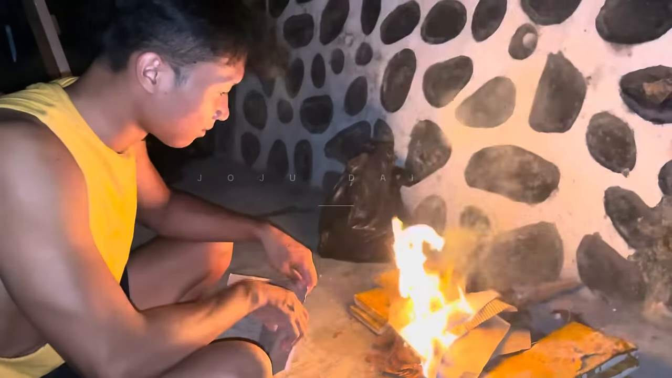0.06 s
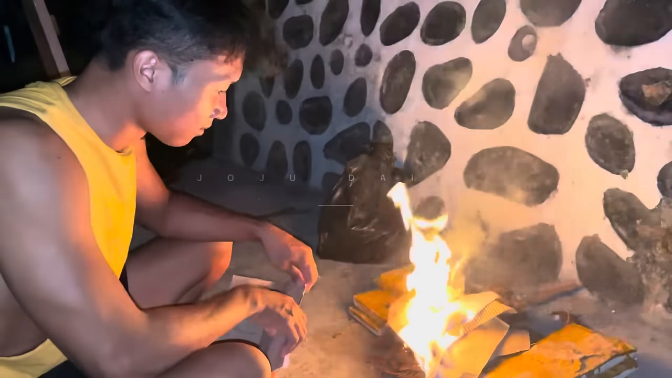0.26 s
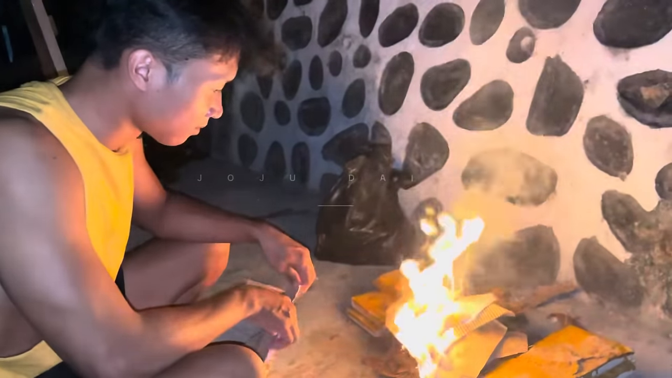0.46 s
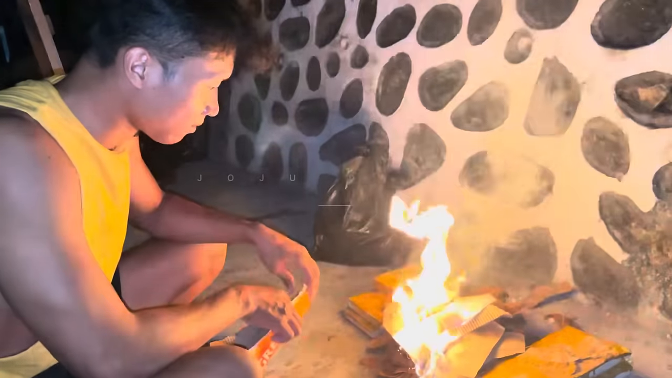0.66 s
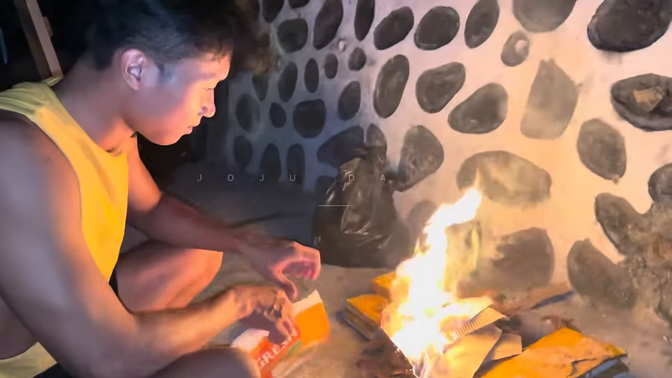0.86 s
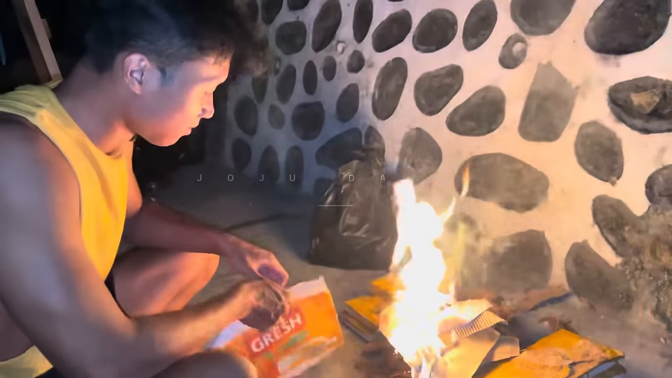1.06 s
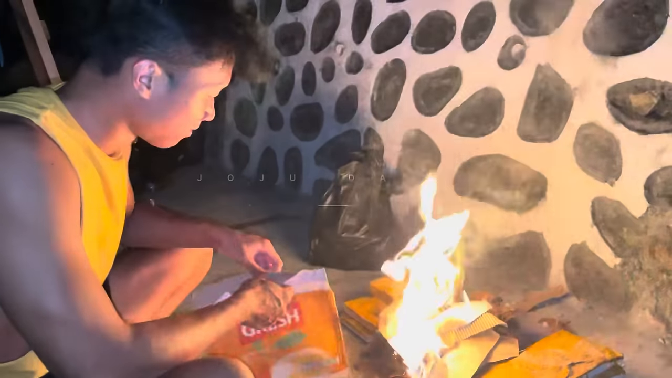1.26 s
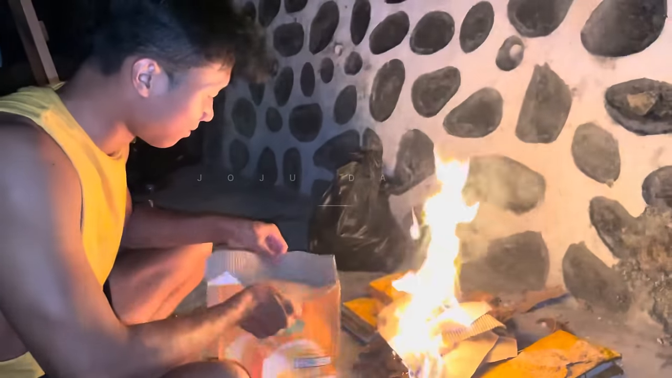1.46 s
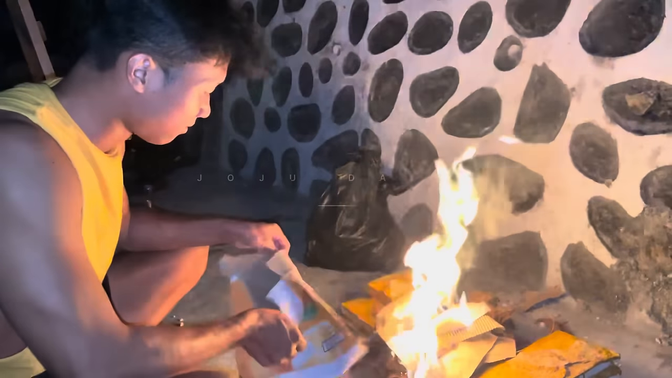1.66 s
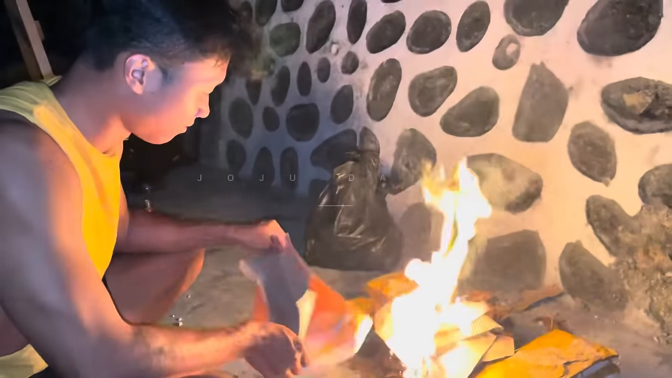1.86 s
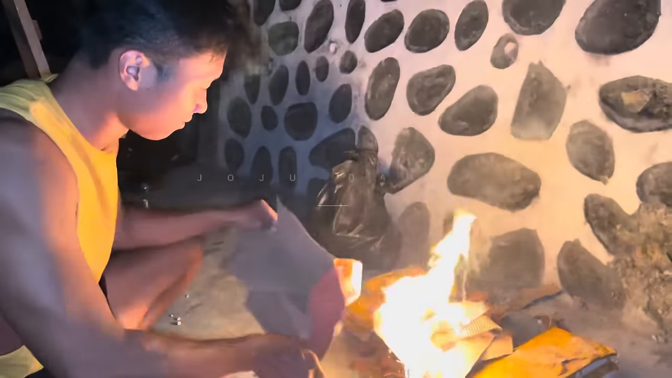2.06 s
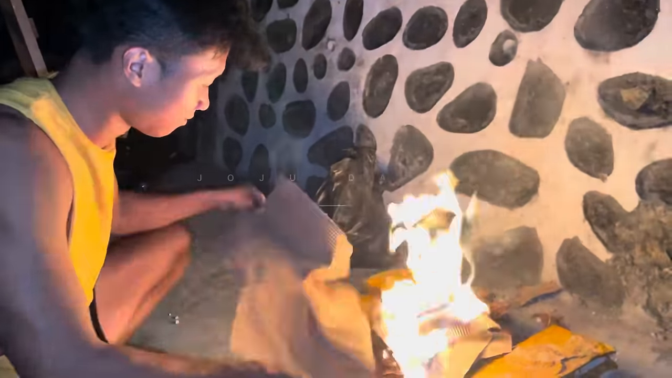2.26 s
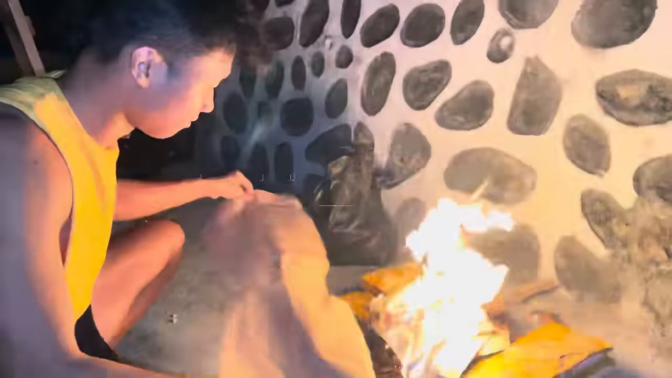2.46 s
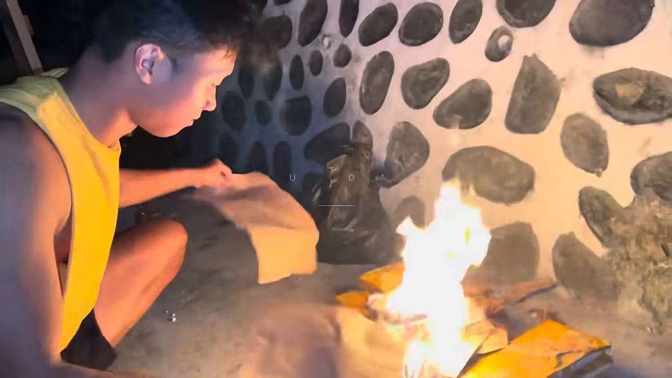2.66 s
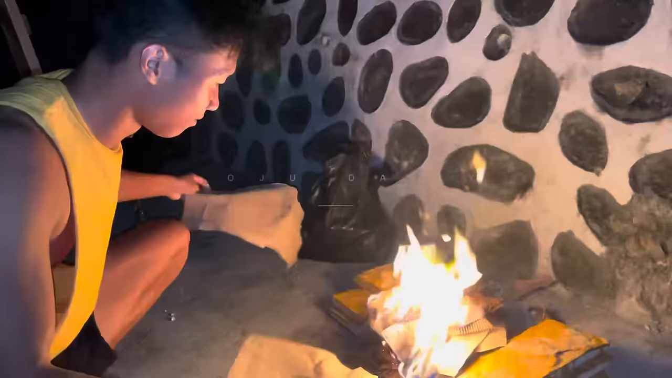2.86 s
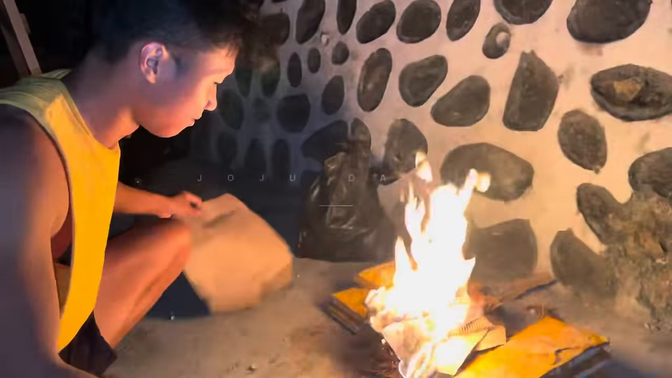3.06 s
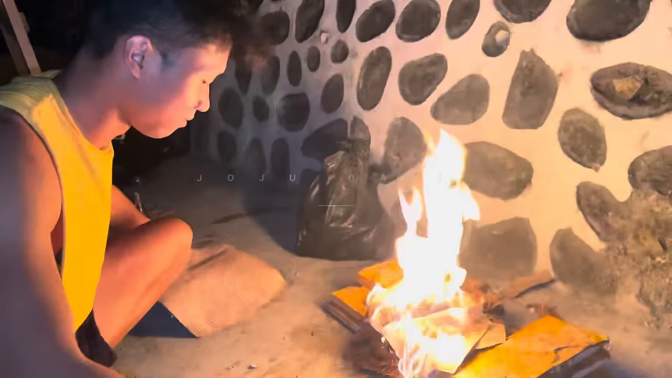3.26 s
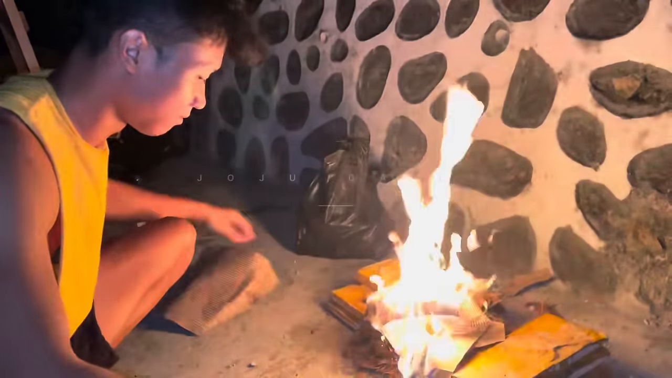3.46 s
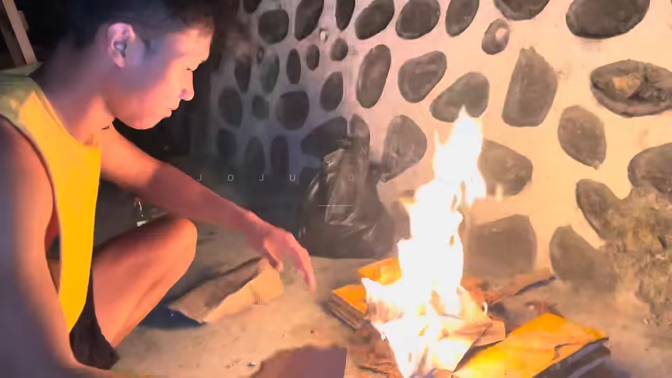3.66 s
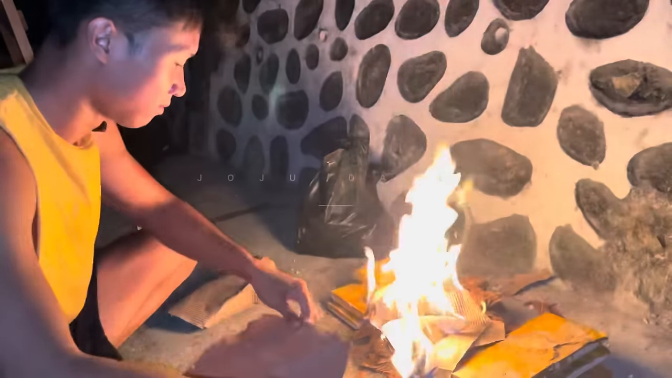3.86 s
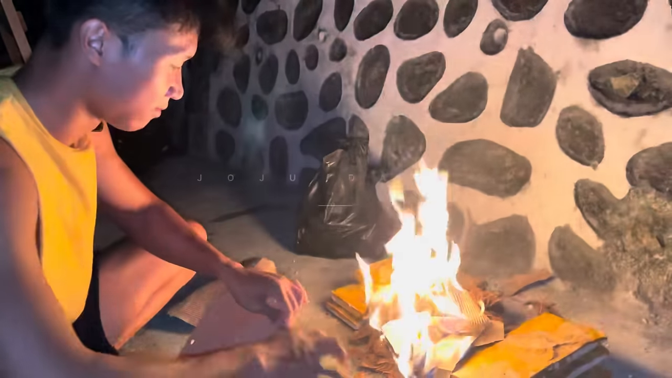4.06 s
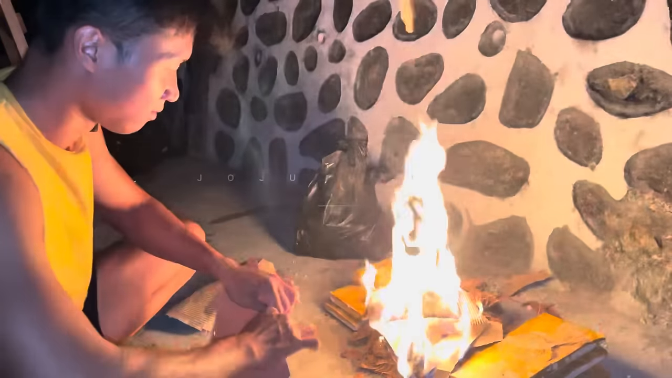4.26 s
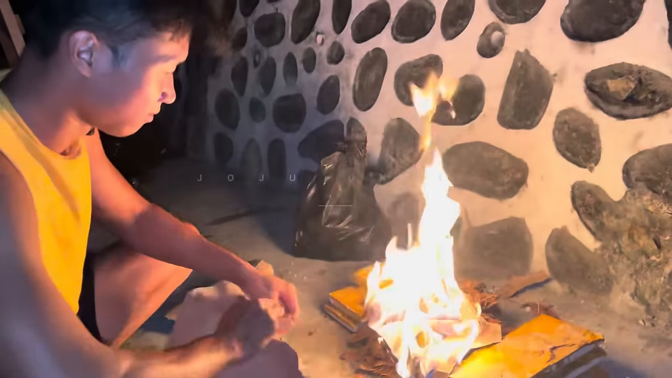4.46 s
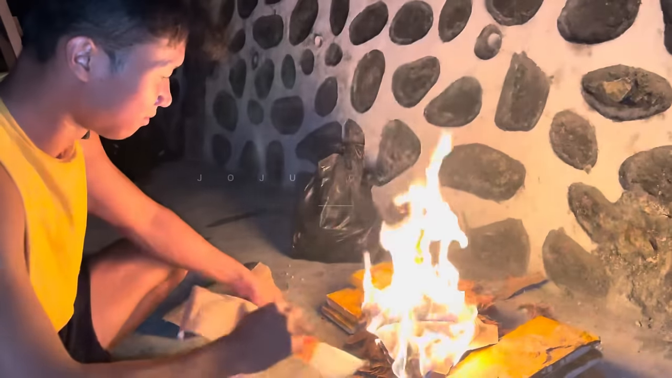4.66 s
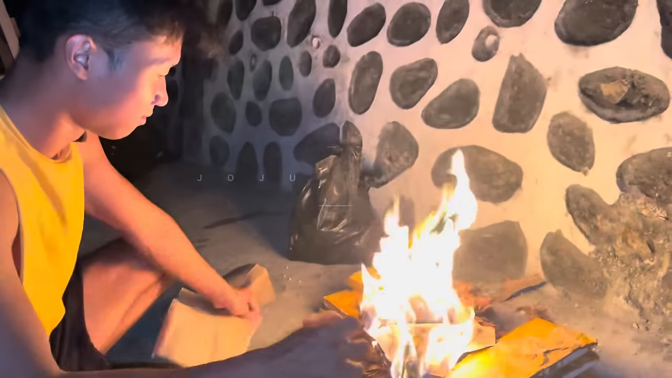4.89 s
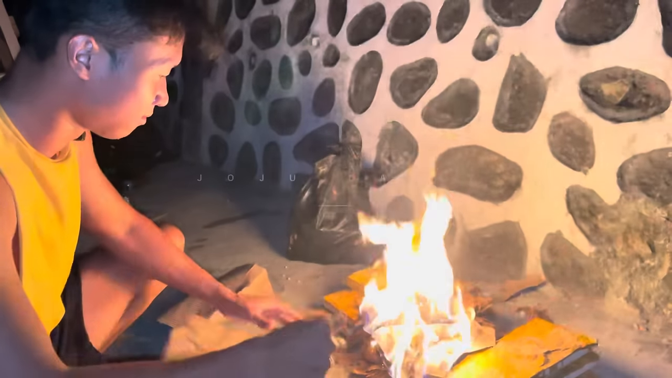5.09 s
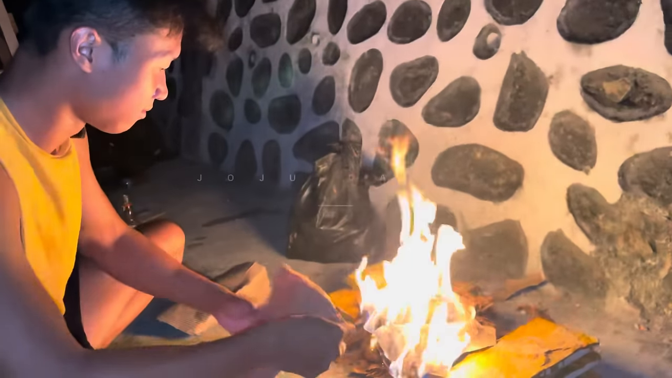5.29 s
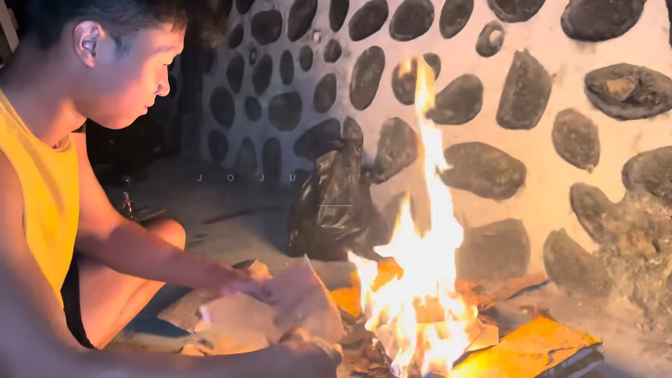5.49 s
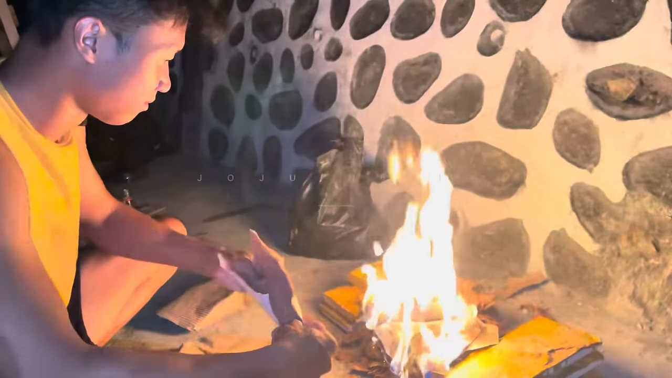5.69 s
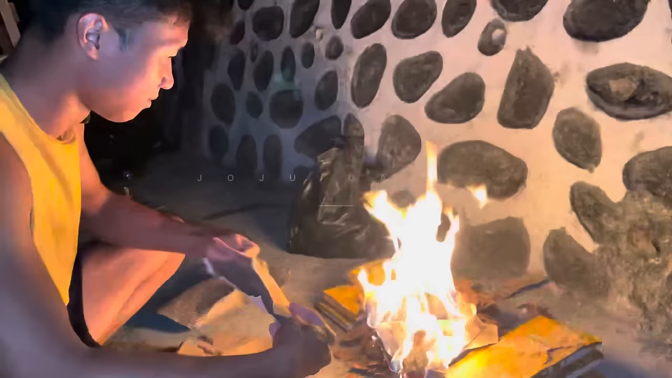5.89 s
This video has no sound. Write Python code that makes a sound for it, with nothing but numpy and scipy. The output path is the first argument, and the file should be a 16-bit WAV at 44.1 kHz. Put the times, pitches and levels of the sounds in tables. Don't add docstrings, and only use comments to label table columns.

```python
import sys
import numpy as np
from scipy import signal
from scipy.io import wavfile
from scipy.ndimage import uniform_filter1d

SR = 44100
rng = np.random.default_rng(int(sys.argv[2]) if len(sys.argv) > 2 else 0)


def to_linear_factor(level_db):
    exponent = np.asarray(level_db, float) / 20
    return 10 ** exponent


def pcm_store(signal):
    levels = np.round(np.clip(np.atleast_2d(signal), -1, 1) * 32767)
    wavfile.write(sys.argv[1], SR, levels.astype(np.int16).T)


N = 261468

# freq_hz, density_db
FIBRE_SPECTRUM = [(1500, -24.5), (3150, -14.5), (3800, -7.5), (4600, -4), (7000, -1.5), (10000, -2),
                  (13200, 0.5), (14100, -2)]
# freq_hz, density_db
SHEET_SPECTRUM = [(100, -37.5), (210, -18.5), (350, -4.5), (440, -6), (570, -5.5), (740, -9), (1050, -5),
                  (2520, -15), (2950, -24.5), (6000, -42)]
# time_s, effort_db
PULLS = [
    [(1.482, -57.5), (1.492, -41), (1.52, -24.5), (1.534, -21.5), (1.548, -22), (1.566, -14),
     (1.592, -26.5), (1.605, -15.5), (1.625, -27)],
    [(1.625, -27.5), (1.68, -24), (1.7, -25.5), (1.738, -17.5), (1.76, -29)],
    [(1.76, -30), (1.8, -29.5), (1.812, -21.5), (1.835, -25), (1.868, -25), (1.884, -18.5), (1.9, -32),
     (1.914, -20), (1.94, -18)],
    [(1.94, -19.5), (1.952, -12), (1.975, -11), (1.988, -15), (2.12, -19.5), (2.175, -16.5), (2.19, -12.5),
     (2.262, -14), (2.304, -36)],
    [(2.31, -41), (2.324, -22.5), (2.36, -13), (2.415, -13), (2.455, -23)],
    [(2.455, -22), (2.5, -24), (2.515, -19.5), (2.574, -21.5), (2.62, -43)],
    [(2.62, -41), (2.645, -32), (2.658, -20.5), (2.685, -16), (2.698, -17.5), (2.711, -29.5), (2.733, -41),
     (2.742, -51.5), (2.85, -69)],
]
# time_s, effort_db
LATER_PULLS = [
    [(4.41, -77.5), (4.432, -25.5), (4.476, -23.5), (4.542, -17.5), (4.575, -18.5), (4.59, -19.5),
     (4.62, -19.5)],
    [(4.62, -19.5), (4.662, -15), (4.72, -20), (4.778, -12.5), (4.838, -22.5), (4.856, -32), (4.9, -66)],
    [(5.79, -66), (5.815, -43.5), (5.835, -38), (5.852, -31.5), (5.929, -34)],
]
# boom_db (re hiss), deep_db, thin_db, dull_hiss_db
PULL_SHEETS = [(1.5, -3, -0.5, -5.5), (1.5, -5.5, -1, -0.5), (6.5, -11.5, -4, 2), (0, -0.5, -0.5, 0.35),
               (-0.5, -3, -1.5, 1), (-2.5, -4.5, -0.5, 2.5), (-4.5, -4, 4.5, 0), (-1, -0.5, -1.5, 1.5),
               (-2.5, -8.5, 0, -3), (-10, -36, 4.5, -15)]
# peak_s, effort_db, rise_s, fall_s, boom_db (re hiss)
BRUSHES = [(.042, -62, .015, .03, 6), (.276, -45, 0.033, 0.063, -2.5), (.325, -59.5, .06, 0.034, 1),
           (.452, -52.5, 0.096, 0.03, -3), (.638, -46, 0.098, 0.064, -9), (1.1, -36.5, 0.019, 0.12, 3),
           (1.185, -46, 0.069, 0.033, -7.5), (1.47, -51.5, 0.088, 0.068, -12),
           (1.38, -37, 0.075, 0.021, -10), (3.31, -51.5, 0.016, 0.14, 4), (3.34, -41.5, 0.058, 0.064, 3.5),
           (3.658, -56.5, 0.023, 0.12, 0), (4.02, -50.5, 0.096, 0.047, -14),
           (4.112, -46.5, 0.018, 0.034, -14.5), (4.238, -50.5, 0.019, 0.11, -7.5),
           (4.268, -49.5, 0.073, 0.052, -15), (5.04, -56, 0.28, 0.15, -4.5), (5.082, -41, 0.012, 0.044, 6),
           (5.281, -43, 0.008, 0.089, -5), (5.305, -44, 0.03, 0.024, -7), (5.438, -48.5, 0.069, 0.3, -3),
           (5.598, -45, 0.07, 0.066, -0.5)]
# peak_s, effort_db, rise_s, fall_s, boom_db (re hiss)
GRIPS = [(.41, -66, .05, .06, 10), (.978, -55.5, 0.029, 0.13, 10.5), (1.08, -46, 0.0089, .05, -10),
         (1.278, -55, 0.088, 0.049, 4.5), (1.348, -47, 0.036, 0.14, -5), (3.178, -43.5, 0.017, 0.12, 10),
         (3.205, -40, 0.044, 0.048, 10), (3.474, -52.5, 0.0089, 0.026, 16), (3.58, -64, .04, 0.052, 5.5),
         (3.75, -69, 0.17, 0.088, 11), (3.94, -62.5, 0.032, 0.063, 19.5), (5.258, -54, .015, 0.02, 15),
         (5.385, -69.5, 0.06, 0.23, 20.5)]
# peak_s, effort_db, rise_s, fall_s, boom_db (re hiss)
SLAPS = [
    (1.142, -36, 0.024, 0.025, 8),
    (5.618, -44.5, 0.015, 0.11, 13),
    (5.664, -31, 0.026, 0.045, 10),
]
# fine_db (share of hiss), deep_db, thin_db, dull_hiss_db
BRUSH_TONE = (-1.16, -3.5, 1, -10)
GRIP_TONE = (-2.5, -5.5, 0, 5.5)
SLAP_TONE = (-29, 4.5, 5.5, 6)
# time_s, peak_db, ring_hz, crack_db (re peak), t60_s
HANDLED_CREASES = [(.28, -41, 986, -3, 0.063), (.971, -27, 1080, -10, 0.06), (.982, -20.5, 1010, -12, 0.1),
                   (1.075, -17, 970, -29, 0.053), (1.083, -21.5, 1040, -14, 0.098),
                   (1.124, -9, 370, -17, 0.017), (1.137, -3.5, 1025, -9, 0.021),
                   (1.138, -8.5, 2700, -32, 0.007), (1.349, -35.5, 1430, 9, 0.088),
                   (1.3745, -29.5, 2060, 7.5, .03), (1.375, -24, 2560, -20, 0.013),
                   (3.175, -16.5, 1353, -31.5, 0.053), (3.202, -15, 650, -21, 0.096),
                   (3.341, -24, 658, -6, 0.076), (3.485, -24.5, 652, -28, 0.058),
                   (3.637, -39, 687, -20.5, 0.07), (3.742, -36, 1350, -28, 0.1),
                   (3.933, -23, 393, -10, 0.054), (4.004, -30.5, 420, -7.5, .04),
                   (4.106, -35, 398, -2, 0.063)]
# time_s, peak_db, ring_hz, crack_db (re peak)
TORN_CREASES = [(1.506, 2, 905, -20), (1.525, -5.5, 1430, -13.5), (1.534, -5, 1040, 3),
                (1.5634, -3.5, 920, -7), (1.598, -14, 1516, 0), (1.638, -4.5, 930, -6),
                (1.6953, 1.5, 800, 2.5), (1.696, -2.5, 2590, -21.5), (1.704, -5, 590, -1.5),
                (1.741, -6.5, 1640, 1), (1.778, -2.5, 935, -7), (1.8103, -0.5, 957, -6.5),
                (1.838, -1.5, 1310, -9), (1.872, 4, 1430, -5), (1.879, 0.5, 1000, -17),
                (1.9124, -1.5, 1060, -4), (1.948, 0, 1410, -3), (1.958, 0, 1440, -0.5),
                (1.972, -3.5, 1110, -3.5), (1.998, 5.5, 1106, -6), (2.184, -5, 845, -5),
                (2.374, 0, 1940, -17.5), (2.411, -3.5, 1230, -2), (2.532, -10, 1357, -18),
                (2.692, -12, 888, -4), (4.433, -28.5, 1070, -1.5), (4.459, -8.5, 640, -16.5),
                (4.482, -2.5, 835, -13.5), (4.5537, -2, 1690, -19), (4.583, 5.5, 1170, -8),
                (4.585, -9, 2420, -22.5), (4.786, 3, 1310, -10.5)]
# time_s, peak_db, ring_hz, crack_db (re peak), t60_s
FOLDED_CREASES = [(5.058, -35.5, 687, -6, .05), (5.082, -32, 700, -22, 0.047),
                  (5.258, -24, 372, -31, 0.063), (5.285, -29.5, 1520, -14, 0.1),
                  (5.376, -24, 915, -23, 0.023), (5.421, -26, 425, -12, 0.056),
                  (5.427, -27.5, 1120, -15, 0.031), (5.468, -22.5, 365, -21, 0.07),
                  (5.484, -17.5, 980, -21, 0.025), (5.5056, -31.5, 1020, -9, 0.11),
                  (5.539, -25.5, 900, -15, 0.03), (5.614, -7, 1055, -18, 0.053),
                  (5.627, -7.5, 381, -17, 0.13), (5.653, 0.5, 890, -20, 0.016),
                  (5.667, -8, 391, -10.5, 0.072), (5.68, -6, 1047, -33, 0.024),
                  (5.796, -30, 877, -19, 0.07)]
# time_s, peak_db, ring_hz
POPS = [(1.031, -33, 400), (1.3867, -32, 1580), (1.6775, -11, 1075), (1.7324, -16, 875),
        (1.859, -6.5, 1410), (1.959, -4.5, 890), (2.0841, -13, 1100), (2.1427, -6, 1200),
        (2.197, -5.5, 1660), (2.223, 2, 588), (2.2338, -4, 1020), (2.2655, -1.5, 515), (2.3486, -5.5, 960),
        (2.3864, -4, 1510), (2.4348, -4, 1270), (2.508, -12, 1040), (2.538, -14, 1330),
        (2.568, -13.5, 1025), (2.6813, -8.5, 766), (3.303, -31.5, 950), (3.478, -31, 650),
        (3.654, -37.5, 621), (3.9513, -22, 494), (3.962, -39.5, 400), (4.4988, -8.5, 1087),
        (4.638, -4, 1070), (4.658, -11, 1130), (4.714, -5.5, 1223), (5.095, -27.5, 660),
        (5.251, -33.5, 1010), (5.3799, -37, 970), (5.4483, -30.5, 765), (5.492, -28, 880),
        (5.6313, -8, 845), (5.657, -11, 1120), (5.691, -24, 995), (5.814, -27.5, 885)]
# freq_hz, density_db
TICK_SPECTRUM = [(500, -28.5), (1500, -3.5), (2600, -1.5), (3300, -9.5), (5500, -0.5), (8000, -6.5),
                 (14000, -23.5)]
# time_s, peak_db, pitch_hz
SPLITS = [(.987, -54, 4850), (.9935, -46, 4820), (1.0975, -39, 8700), (1.139, -22, 6800),
          (1.3495, -30, 9000), (1.489, -34.5, 7000), (1.525, -13, 7200), (1.572, -8, 6000),
          (1.7055, -11, 5276), (1.743, -13.5, 7880), (1.806, -17, 4800), (1.838, -14.5, 8420),
          (1.856, -15, 8000), (1.8793, -12, 6620), (1.95, -11, 6820), (1.9672, -9, 5294),
          (1.971, -4.5, 6400), (2.01, -13.5, 7800), (2.235, -8.5, 4810), (2.248, -7, 6020),
          (2.257, -11, 4600), (2.321, -9, 7000), (2.534, -10.5, 5400), (2.696, -9, 7000),
          (2.874, -50, 4710), (3.2195, -31, 3720), (3.317, -39, 6500), (4.707, -18, 9000),
          (4.7698, -8.5, 4460), (5.653, -18, 6000), (5.658, -18, 4100), (5.6695, -32, 4200)]
# start_s, end_s, start_hz, end_hz, level_db
PANELS = [(1.508, 1.535, 900, 930, -20), (1.56, 1.62, 395, 334, -26.5), (1.625, 1.655, 937, 900, -25),
          (1.69, 1.73, 591, 534, -28.5), (1.82, 1.87, 560, 590, -36), (1.915, 1.95, 728, 397, -24),
          (1.95, 2.02, 564.4, 600, -25), (2.18, 2.215, 1927, 1690, -22.5), (2.21, 2.27, 556, 1256, -19.5),
          (2.325, 2.37, 1042, 896, -24.5), (2.37, 2.425, 1694, 1953, -20.5), (2.505, 2.58, 990, 985, -30),
          (2.52, 2.58, 466, 522, -30.5), (4.46, 4.51, 846, 1266, -27), (4.46, 4.52, 382, 379, -25),
          (4.52, 4.6, 601, 586, -26.5), (4.64, 4.72, 955, 1230, -29.5), (4.785, 4.82, 1265, 1326, -22),
          (5.654, 5.664, 1030, 1000, -13), (5.615, 5.63, 1863, 1810, -29.5), (2.66, 2.71, 1390, 1674, -28),
          (5.655, 5.675, 553, 502, -25.5)]
# start_s, end_s, start_hz, end_hz, level_db
THUDS = [(1.51, 1.67, 245, 226, -37.5), (1.7, 1.78, 224, 217, -39), (1.86, 1.9, 130, 120, -37.5),
         (2.2, 2.31, 70, 55, -41), (2.33, 2.42, 189, 60, -39), (2.5, 2.66, 45.2, 90, -54),
         (3.17, 3.24, 325, 243, -48), (4.5, 4.65, 270, 190, -40.5)]
# start_s, end_s, start_hz, end_hz, level_db
POCKETS = [(.97, 1.015, 1060, 837, -38), (.4, 0.47, 1140, 1100, -59.5), (.978, 1.005, 4400, 5100, -51.5),
           (1.085, 1.12, 5600, 5200, -50), (1.124, 1.132, 2700, 2600, -38), (1.142, 1.156, 3900, 2480, -38),
           (1.507, 1.519, 1090, 810, -24.5), (2.752, 2.8, 4900, 4500, -54.5),
           (2.74, 2.835, 10000, 15000, -57), (4.7, 4.745, 4100, 3800, -25.5),
           (4.75, 4.8, 4600, 4500, -21.5), (5.277, 5.32, 4600, 5000, -49.5), (5.28, 5.315, 8500, 8000, -62),
           (5.43, 5.5, 6600, 5700, -53.5), (0, 0.33, 13000, 12000, -67), (.265, .295, 13300, 12000, -47),
           (3.31, 3.38, 3700, 4200, -54.5), (.61, .66, 2000, 1900, -63), (.27, .295, 2500, 2200, -57),
           (.27, 0.38, 1100, 1090, -71), (3.735, 3.77, 550, 740, -53.5), (5.278, 5.32, 970, 1597, -48.5),
           (5.805, 5.929, 900, 1050, -47.5)]
# peak_s, level_db, rise_s, fall_s
FLAPS = [(1.56, -45.5, 0.16, 1), (1.996, -32.5, 0.15, 0.095), (2.3, -33, .5, 0.25), (4.57, -48, .2, 0.22),
         (4.751, -53, 0.26, .3), (5.672, -36.5, 0.092, 0.047)]
# freq_hz, density_db
ROAR_SPECTRUM = [(20, -6), (70, -1.5), (190, -2), (320, -8), (500, -15), (900, -16), (1500, -24.5),
                 (2500, -29), (6000, -30.5), (14000, -31)]
# start_s, end_s, start_hz, end_hz, level_db
STEAM = [
    (3.88, 3.948, 11650, 13900, -64),
    (3.94, 4.045, 13900, 12700, -60),
    (4.04, 4.1, 13000, 12500, -61),
]
# start_s, end_s, start_hz, end_hz, level_db
DRAUGHT = [(.3, .43, 11250, 11280, -61), (3.1, 4.15, 188.3, 189.7, -58), (3.9, 4.5, 139.7, 141.3, -59),
           (4.1, 4.5, 189.3, 192, -65), (4.1, 4.22, 11700, 11550, -73.5)]

PULL_FINE_DB = -1.5
SLACK_BOOM_DB_PER_DB = -0.06
DEEP_DB_PER_BOOM_DB, THIN_DB_PER_BOOM_DB = 0.67, -0.32
ARCH_DROP_DB, ARCH_BEND = 33.5, 1.24
TORN_T60_S, TORN_T60_S_PER_DB = 0.021, -0.0033
POP_CRACK_DB, POP_T60_S = -22, 0.039
SPLIT_RISE_S, SPLIT_T60_S = 0.00043, 0.0074
SPLIT_WIDTH, PANEL_WIDTH, POCKET_WIDTH = 0.92, 0.1, 0.28
STEAM_WIDTH, DRAUGHT_WIDTH = 0.03, 0.0027
ROAR_DB = -55.5
MIC_EDGE_HZ = 14150


def tearing():
    hiss = colour(fractures(per_s=14000, spread_db=0.0, clump_db=1.0, clump_s=0.0016), FIBRE_SPECTRUM)
    boom = colour(fractures(per_s=2500, spread_db=2.0, clump_db=1.3, clump_s=0.004), SHEET_SPECTRUM)
    hiss = patchy(hiss, 2.6, bins=7, frames=7)
    boom = patchy(boom, 2.2, bins=2, frames=7) * hush(depth=0.65, lead_s=0.008)
    deep, rest = halves(boom, 610)
    middle, thin = halves(rest, 1500)
    coarse, fine = halves(hiss, 8690)
    dull, bright = halves(coarse, 4300)
    tables = []
    for time_s, hiss_db, boom_db, fine_db, deep_db, thin_db, dull_db in movements():
        coarse_share = np.clip(1 - to_linear_factor(2 * fine_db), 0.03, 1)
        coarse_db = hiss_db + 10 * np.log10(coarse_share)
        sheet_db = hiss_db + boom_db - 8.5
        tables.append([
            time_s,
            coarse_db + dull_db - 8.5,
            coarse_db - 2.1,
            hiss_db + fine_db + 2.5,
            sheet_db + deep_db,
            sheet_db,
            sheet_db + thin_db + 0.5,
        ])
    return (effort(tables) * [dull, bright, fine, deep, middle, thin]).sum(0)


def movements():
    for rows, (boom_db, *parts_db) in zip(PULLS + LATER_PULLS, PULL_SHEETS):
        time_s, effort_db = np.transpose(rows)
        slack_db = SLACK_BOOM_DB_PER_DB * np.clip(-21.0 - effort_db, 0, 15)
        yield time_s, effort_db, boom_db + slack_db, PULL_FINE_DB, *parts_db
    for rows, tone in ((BRUSHES, BRUSH_TONE), (GRIPS, GRIP_TONE), (SLAPS, SLAP_TONE)):
        fine_db, deep_db, thin_db, dull_db = tone
        for *shape, boom_db in rows:
            deeper_db = deep_db + DEEP_DB_PER_BOOM_DB * boom_db
            thinner_db = thin_db + THIN_DB_PER_BOOM_DB * boom_db
            yield *arch(*shape), boom_db, fine_db, deeper_db, thinner_db, dull_db


def arch(peak_s, peak_db, rise_s, fall_s):
    u = np.linspace(-2, 2, 33)
    time_s = peak_s + u * np.where(u < 0, rise_s, fall_s)
    return time_s, peak_db - ARCH_DROP_DB * abs(u) ** ARCH_BEND


def effort(tables):
    t, gains = np.arange(0, N, 32) / SR, 0
    for time_s, *levels_db in tables:
        outside_s = np.maximum(np.maximum(time_s[0] - t, t - time_s[-1]), 0)
        curves_db = [np.interp(t, time_s, db) for db in levels_db] - 1500 * outside_s
        gains = np.maximum(gains, to_linear_factor(np.maximum(curves_db, -150)))
    return np.array([np.interp(np.arange(N) / SR, t, gain) for gain in gains])


def fractures(per_s, spread_db, clump_db, clump_s):
    size = to_linear_factor(spread_db * np.minimum(rng.exponential(1, N), 4.5)) * rng.choice([-1, 1], N)
    clumps = signal.lfilter([1], [1, -np.exp(-1 / (clump_s * SR))], rng.standard_normal(N))
    clumps = evened(uniform_filter1d(clumps, size=40))
    happens = rng.random(N) < per_s / SR
    return size * happens * to_linear_factor(clump_db * clumps)


def patchy(x, patch_db, bins, frames):
    z = signal.stft(x, nperseg=512)[2]
    lumps = uniform_filter1d(rng.standard_normal(z.shape[::-1]), frames, 0)
    lumps = evened(uniform_filter1d(lumps, bins, 1))
    return signal.istft(z * to_linear_factor(patch_db * lumps.T), nperseg=512)[1][:N]


def hush(depth, lead_s):
    marks = np.zeros(N)
    marks[(np.transpose(creases())[0] * SR).astype(int)] = 1
    dip = np.exp(-np.arange(1500)[::-1] / (lead_s * SR))
    return 1 - np.clip(depth * signal.oaconvolve(marks, dip)[1440:][:N], 0, 0.9)


def creases():
    torn = [(*row, TORN_T60_S + TORN_T60_S_PER_DB * row[1]) for row in TORN_CREASES]
    pops = [(*row, POP_CRACK_DB, POP_T60_S) for row in POPS]
    return HANDLED_CREASES + torn + FOLDED_CREASES + pops


def snaps():
    ring, tick, puff = np.zeros(N), np.zeros(N), np.zeros(N)
    t = np.arange(6000) / SR
    rows = creases()
    chance = rng.random((len(rows), 2, 6))
    noises = rng.standard_normal((len(rows), len(t)))
    for (s, db, hz, crack_db, t60_s), (where, turn), noise in zip(rows, chance, noises):
        t60_s = np.clip(t60_s, 0.008, 0.085)
        s = s + 0.0012
        u = np.pi * (800 + 0.39 * hz) * (t - 0.0006)
        push = np.sign(turn[0] - 0.5) * (1 - 2 * u ** 2) * np.exp(-u ** 2)

        others_hz = (300 + 0.37 * hz) * 4.3 ** where
        others = np.sin(2 * np.pi * (others_hz[:, None] * t + turn[:, None]))
        modes = np.sin(2 * np.pi * hz * t) + to_linear_factor(read(SHEET_SPECTRUM, others_hz) - 4) @ others
        modes = modes * to_linear_factor(-60 * t / t60_s) * (1 - np.exp(-t / 0.0014))
        add(ring, s, to_linear_factor(db) * (to_linear_factor(-2.0) * push + to_linear_factor(-4.5) * modes / abs(modes).max()))

        add(tick, s, to_linear_factor(db + crack_db - 60 * t / 0.013) * (1 - np.exp(-t / 0.0007)) * noise)
        add(puff, s, to_linear_factor(db + crack_db - 60 * t / (2.0 * t60_s)) * noise[::-1])
    ring = colour(ring, [(60, -46.5), (250, 2.0), (400, -5.0)])
    tick = colour(tick, TICK_SPECTRUM)
    puff = colour(puff, FIBRE_SPECTRUM)
    return to_linear_factor(-1.0) * ring + to_linear_factor(3.0) * tick + to_linear_factor(-13.5) * puff


def splits():
    out, t = np.zeros(N), np.arange(1200) / SR
    for s, db, hz in SPLITS:
        r = np.exp(-np.pi * SPLIT_WIDTH * hz / SR)
        poles = [1, -2 * r * np.cos(2 * np.pi * hz / SR), r ** 2]
        spit = evened(signal.lfilter([1, 0, -1], poles, rng.standard_normal(len(t))))
        envelope = to_linear_factor(db + 4.0 - 60 * t / SPLIT_T60_S) * (1 - np.exp(-t / SPLIT_RISE_S))
        add(out, s, envelope * spit)
    return out


def whistles(rows, width):
    out = np.zeros(N)
    for start_s, end_s, start_hz, end_hz, db in rows:
        n = round((end_s - start_s) * SR)
        r = np.exp(-np.pi * width * end_hz / SR)
        noise = rng.standard_normal((SR + n, 2)) @ [1, 1j]
        fuzz = signal.lfilter([1], [1, -2 * r, r ** 2], noise)[-n:]
        turns = np.cumsum(np.linspace(start_hz, end_hz, n)) / SR
        tone = evened((fuzz * np.exp(2j * np.pi * turns)).real)
        add(out, start_s, to_linear_factor(db) * tone * signal.windows.tukey(n, 0.5))
    return out


def wall(x):
    taps = np.zeros(8000)
    taps[np.arange(100, 7900, 20) + rng.integers(0, 20, 390)] = rng.choice([-1., 1.], 390)
    hz, t, z = signal.stft(taps, SR, nperseg=256)
    t60_s = read([(200, 0.089), (1500, 0.085), (10000, 0.011)], hz)[:, None]
    tail = signal.istft(z * to_linear_factor(-60 * t / t60_s), SR, nperseg=256)[1]
    return signal.oaconvolve(x, tail / np.linalg.norm(tail))[:N]


def flapping():
    spectrum = [(20, -22), (60, -8.0), (130, -1.5), (220, -4.5), (400, -21.0), (1000, -65.5)]
    gusts = evened(colour(rng.standard_normal(N), spectrum))
    return to_linear_factor(-1.5) * effort(arch(*row) for row in FLAPS)[0] * gusts


def fire():
    low, high = halves(colour(rng.standard_normal(N), ROAR_SPECTRUM), 340)
    roar = to_linear_factor(ROAR_DB) * (low + to_linear_factor(-4.0) * patchy(high, 1.1, bins=8, frames=8))
    clicks = fractures(per_s=60, spread_db=3.0, clump_db=2.5, clump_s=0.05)
    ticks = to_linear_factor(-56) * colour(clicks, FIBRE_SPECTRUM)
    return roar + ticks + whistles(STEAM, STEAM_WIDTH) + whistles(DRAUGHT, DRAUGHT_WIDTH)


def evened(x):
    return x / np.sqrt(np.mean(x ** 2) + 1e-20)


def read(points, hz):
    f, value = np.transpose(points)
    return np.interp(np.log(hz + 1), np.log(f + 1), value)


def add(mix, s, sound):
    part = mix[round(s * SR):][:len(sound)]
    part += sound[:len(part)]


def colour(x, points):
    log_gain = np.log(to_linear_factor(read(points, abs(np.fft.fftfreq(4096, 1 / SR)))))
    taps = np.fft.ifft(np.exp(np.conj(signal.hilbert(log_gain)))).real[:2048]
    return signal.oaconvolve(x, taps)[:len(x)]


def halves(x, hz):
    low = signal.sosfiltfilt(signal.butter(3, hz, fs=SR, output="sos"), x)
    return evened(low), evened(x - low)


def scene():
    panels = to_linear_factor(-2.5) * whistles(PANELS, PANEL_WIDTH)
    thuds = to_linear_factor(-1.5) * whistles(THUDS, POCKET_WIDTH)
    board = tearing() + snaps() + splits() + panels + thuds
    echo = to_linear_factor(-18.5) * wall(board)
    pockets = whistles(POCKETS, POCKET_WIDTH)
    return (board + echo + flapping() + fire() + pockets)[None]


def roll_off(x):
    return signal.sosfilt(signal.butter(12, 15320, fs=SR, output="sos"), x)


def record(dry):
    heard = colour(dry[0], [(2500, 0.27), (3150, -0.77), (3900, -0.64)])
    band_limit = signal.firwin(401, MIC_EDGE_HZ, window=("kaiser", 6), fs=SR)
    limited = signal.oaconvolve(heard, band_limit, "same")
    return roll_off(np.clip(limited, -1, 1)[None])


dry = scene()
out = record(dry)
pcm_store(out)
```